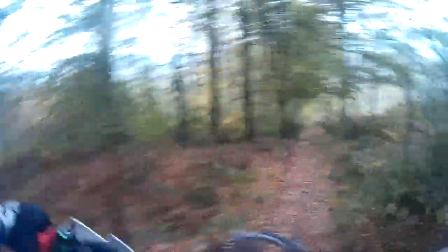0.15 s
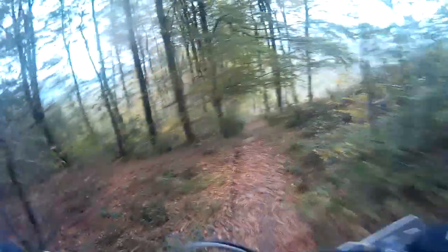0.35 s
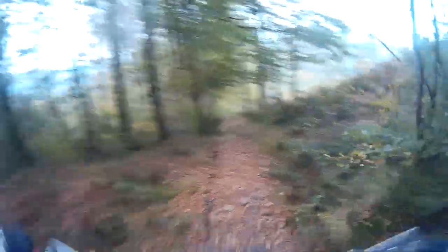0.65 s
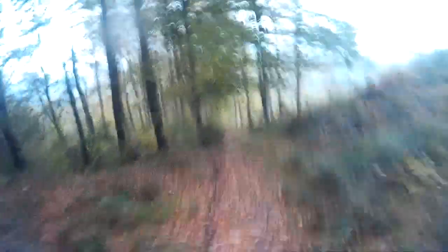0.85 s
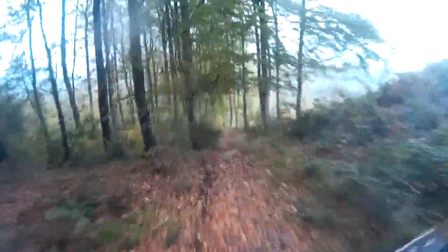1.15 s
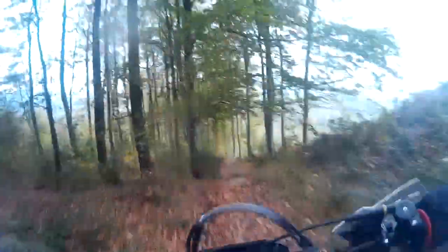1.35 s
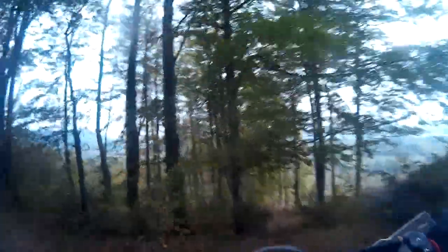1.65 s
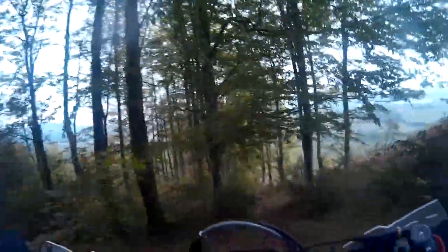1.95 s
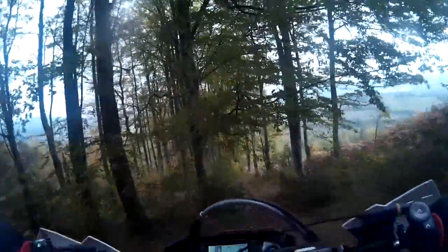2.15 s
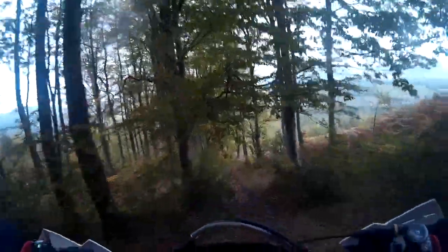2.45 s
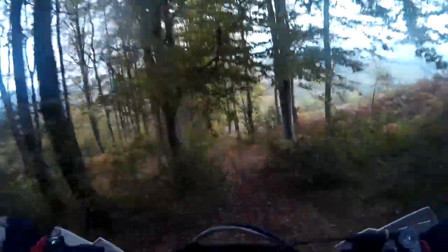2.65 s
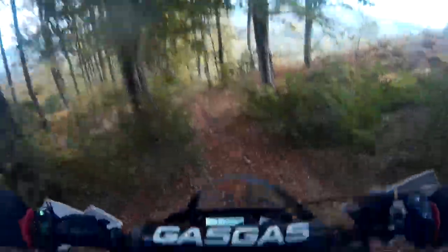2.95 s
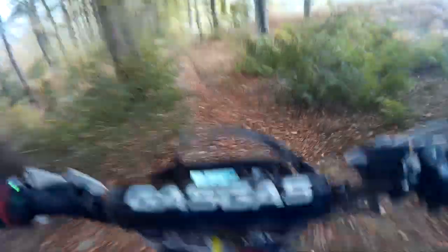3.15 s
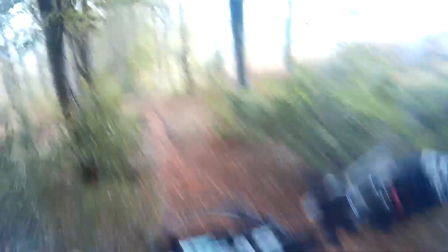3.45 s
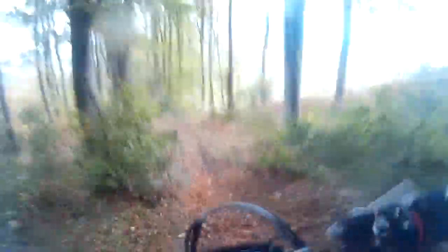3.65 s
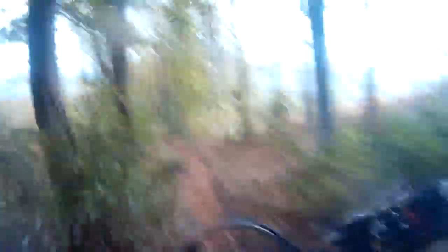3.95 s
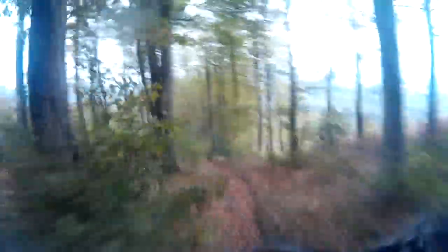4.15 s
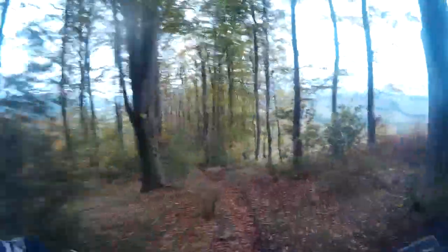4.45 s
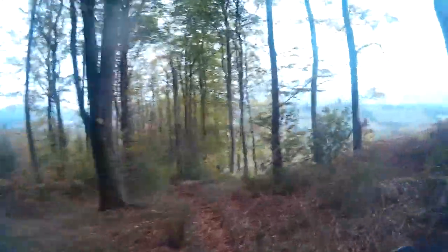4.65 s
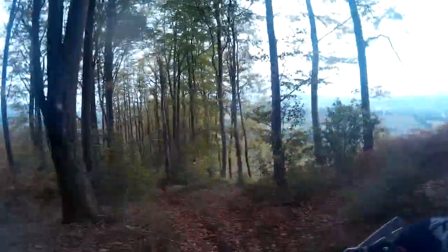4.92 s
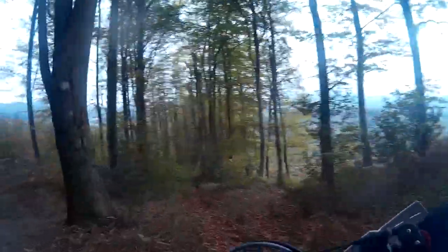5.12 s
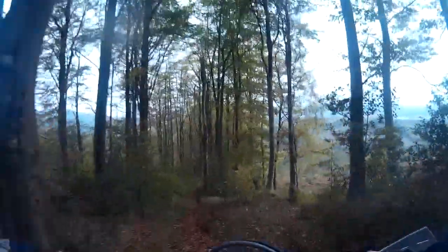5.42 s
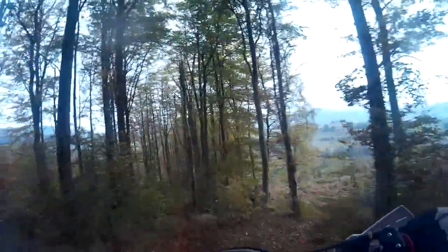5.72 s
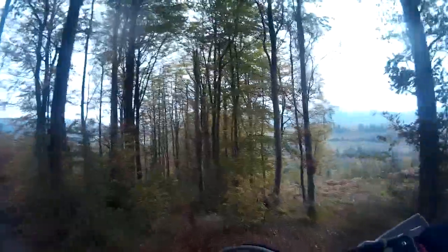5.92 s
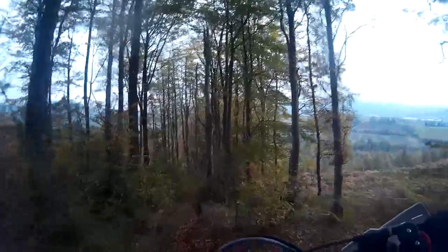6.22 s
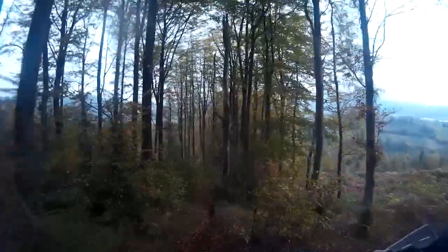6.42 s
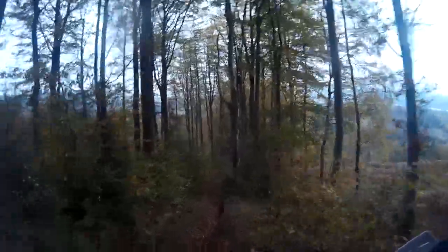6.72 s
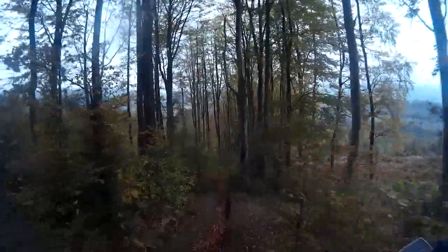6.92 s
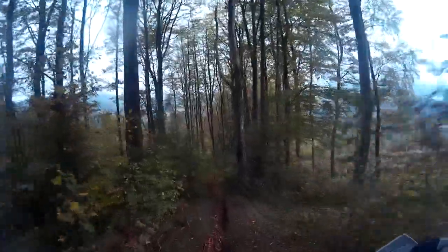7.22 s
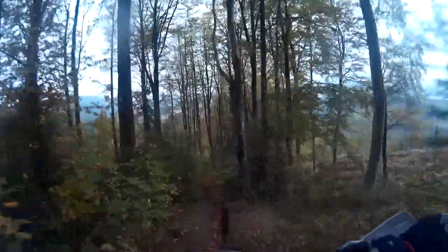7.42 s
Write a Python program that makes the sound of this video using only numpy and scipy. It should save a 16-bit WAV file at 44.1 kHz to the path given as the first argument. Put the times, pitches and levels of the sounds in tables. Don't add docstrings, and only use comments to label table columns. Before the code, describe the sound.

A boxy, buzzing single-cylinder motorcycle engine runs low along a leafy trail, with helmet rumble, knocks, an early scrape and a sharp crack near three seconds.

```python
import sys
import numpy as np
from scipy import signal
from scipy.fft import rfft, irfft
from scipy.io import wavfile
from scipy.ndimage import uniform_filter1d

SR = 44100
rng = np.random.default_rng(int(sys.argv[2]) if len(sys.argv) > 2 else 0)


def attenuation_scalar(level_db):
    decades = np.asarray(level_db, float) / 20
    return 10 ** decades


def store_pcm(level_fs):
    pcm = np.round(np.clip(level_fs, -1, 1) * 32767).astype(np.int16)
    wavfile.write(sys.argv[1], SR, np.atleast_2d(pcm).T)


N = 334229

# time in seconds, speed in turns per second.
CRANK_SPEED = [(0.0, 23.12), (0.29, 27.78), (0.8, 25.08), (1.05, 31.07), (1.65, 33.45), (1.71, 31.39),
               (2.06, 33.31), (2.72, 27.51), (3.4, 33.59), (3.85, 32.35), (4.45, 36.92), (4.86, 36.55),
               (4.99, 38.51), (5.81, 40.74), (6.28, 36.22), (6.69, 34.2), (6.82, 31.35), (7.58, 33.24)]
CAVITY_HZ, CAVITY_WIDTH_HZ = 1330, 26


def evened(x):
    return x / np.sqrt(np.mean(x ** 2) + 1e-20)


def steadied(x, size, share):
    power = uniform_filter1d(evened(x) ** 2, size)
    return evened(x / (power + 0.039) ** (share / 2))


def smooth_noise(size):
    return evened(uniform_filter1d(rng.standard_normal(N), size))


def column(rows, count):
    rows = np.array(rows)
    return np.interp(np.arange(N) / SR, rows[:, 0], rows[:, count])


def add(mix, s, sound):
    part = mix[round(s * SR):][:len(sound)]
    part += sound[:len(part)]


def ring(x, modes, tilt_db=0):
    out = np.zeros(len(x))
    for k, (hz, width_hz, db) in enumerate(modes):
        r, angle = np.exp(-np.pi * width_hz / SR), 2 * np.pi * hz / SR
        level = attenuation_scalar(db + tilt_db * np.log2(hz / 1000))
        gain = (-1) ** k * level * (1 - r) * 2 * np.sin(angle)
        out += gain * signal.lfilter([1], [1, -2 * r * np.cos(angle), r * r], x)
    return out


def coloured(points):
    hz, db = np.transpose(points)
    bins_hz = np.fft.rfftfreq(N, 1 / SR)
    shape = attenuation_scalar(np.interp(np.log(bins_hz + 1), np.log(hz + 1), db))
    return evened(irfft(rfft(rng.standard_normal(N)) * shape, N))


def dying(hz, t60_s, rise_s=0.00021, wave=np.sin):
    t = np.arange(round(.15 * SR)) / SR
    return wave(2 * np.pi * hz * t) * attenuation_scalar(-60 * t / t60_s) * (1 - np.exp(-t / rise_s))


def strokes(turns, at, spread_db):
    whole = np.floor(turns - at).astype(int) + 2
    strength = attenuation_scalar(spread_db * rng.standard_normal(400))[whole]
    return (turns - at) % 1, np.diff(whole, prepend=whole[0]), strength


def follows(db, share):
    # time in seconds, level in dB.
    load = [(0.0, -57), (0.38, -57), (0.65, -54.5), (0.91, -56.5), (1.39, -51.5), (1.94, -50),
            (2.22, -53.5), (2.74, -53.5), (3.44, -49), (3.76, -49.5), (4.14, -54), (4.87, -51.5),
            (5.47, -50), (6.06, -50.5), (6.33, -55.5), (7.07, -57.5), (7.26, -56.5), (7.58, -56)]
    return attenuation_scalar(db + share * (column(load, count=1) + 52))


def rasp(turns):
    # frequency in Hz, width in Hz, level in dB.
    case_modes = [(584, 33, -20), (713, 11, -19.5), (1189, 135, -7), (1326, 187, -6), (1586, 60, -9),
                  (1803, 50, -13), (1930, 55, -19), (2384, 214, -24.5), (2900, 380, -28.5),
                  (3830, 230, -30), (4700, 170, -39)]
    firing_turns, rise_turns, fade_turns = .27, .1, .44
    place, _, strength = strokes(turns, -.5, spread_db=1.4)
    strength = uniform_filter1d(strength, 200)
    after = (place - firing_turns) % 1
    gate = np.minimum(after / rise_turns, 1) * np.exp(-(after / fade_turns) ** 2.4)
    gate = uniform_filter1d(gate, 40)

    burst = ring((gate + .36) * rng.standard_normal(N), case_modes[2:7])
    burst = steadied(burst, size=1000, share=0.75)
    burst = signal.lfilter(*signal.butter(5, 2020, fs=SR), burst)
    drone = evened(ring((gate + 4.7) * rng.standard_normal(N), case_modes[:2]))
    cavity = ring(rng.standard_normal(N), [(CAVITY_HZ, CAVITY_WIDTH_HZ, 0)])
    cavity = steadied(cavity, size=250, share=.85)
    cavity = evened((uniform_filter1d(gate, 200) + .24) * cavity)
    body = strength * (attenuation_scalar(-5) * burst + cavity + attenuation_scalar(-21.5) * drone)
    return follows(-52, 0.7) * body + swish(gate, case_modes[7:])


def swish(gate, high_modes):
    # middle in seconds, length in seconds, level over the swish in dB.
    leaf_brushes = [
        (1.27, .2, 2.5),
        (3.16, 0.26, 4),
        (4.452, 0.48, 6),
        (5.004, .15, 3.5),
    ]
    t = np.arange(N) / SR
    brush_db = sum(db * np.exp(-(2 * (t - s) / length_s) ** 2) for s, length_s, db in leaf_brushes)
    hiss = evened(ring((1 + 0.2 * gate) * rng.standard_normal(N), high_modes))
    return follows(-75.5 + brush_db, 0.51) * hiss


def exhaust(turns):
    # frequency in Hz, width in Hz, level in dB.
    pipe_modes = [(251, 19, 0.5), (301, 58, -2)]
    # multiple of crank speed, level in dB.
    crank_orders = [(5, -5), (6, 0), (7, -2), (9, -10), (11, -10)]
    jitter_turns, choke_hz, choke_db_per_hz = .045, 33.5, -2.4
    uneven = evened(uniform_filter1d(uniform_filter1d(rng.standard_normal(N), 600), 600))
    place, opened, strength = strokes(turns + jitter_turns * uneven, .27, spread_db=1.5)
    flutter = .016 * np.exp(-place / .45) * rng.standard_normal(N)
    puff = uniform_filter1d(strength * (opened + flutter), 40)

    crank_hz = column(CRANK_SPEED, count=1)
    choke = attenuation_scalar(choke_db_per_hz * np.maximum(crank_hz - choke_hz, 0))
    pipe = follows(-60.5, .5) * choke * evened(ring(puff, pipe_modes))
    orders = sum(attenuation_scalar(db) * np.cos(2 * np.pi * k * (turns - .4)) for k, db in crank_orders)
    pull = attenuation_scalar(-70.5 + 1.3 * (crank_hz - 33.5))
    shake = attenuation_scalar(-58.5) * np.cos(2 * np.pi * (turns - .35))
    return pipe + pull * orders + shake


def rocking():
    # middle in seconds, level in dB, frequency in Hz.
    helmet_jolts = [(0.104, -45.8, 10), (0.646, -46.0, 10), (0.807, -38.6, 12), (0.902, -42.4, 14),
                    (1.002, -46.8, 14), (1.272, -35.1, 16), (1.517, -44.9, 16), (1.83, -48.5, 10),
                    (1.927, -46.2, 12), (2.714, -46.9, 14), (3.311, -41.7, 18), (3.392, -48.3, 10),
                    (3.553, -35.2, 18), (3.651, -43.2, 12), (3.723, -45.2, 12), (3.898, -39.2, 14),
                    (4.0, -43.1, 12), (4.116, -46.1, 12), (4.32, -44.3, 12), (4.617, -48.8, 10),
                    (4.712, -37.9, 14), (4.921, -46.9, 10), (5.034, -40.7, 12), (5.322, -38.8, 14),
                    (5.433, -45.0, 16), (6.059, -43.2, 14), (6.179, -43.1, 14), (6.687, -43.7, 16),
                    (7.104, -45.1, 12), (7.472, -40.7, 16)]
    tremble_mode = [(16, 15, 0)]  # Hz, width Hz, dB
    tremble = ring(ring(rng.standard_normal(N), tremble_mode), tremble_mode)
    out = attenuation_scalar(-62.5) * evened(tremble)
    for s, db, hz in helmet_jolts:
        turn = np.arange(-1, 1, hz / SR)
        swing = np.cos(np.pi * turn / 2) ** 2 * np.sin(-2 * np.pi * turn)
        add(out, s - 1 / hz, attenuation_scalar(db) * swing)
    return out


def rumble(swing):
    # frequency in Hz, level in dB per Hz.
    rumble_colour = [(15, -31), (25, 5), (50, -11), (87, -8), (134, -13), (243, -11), (520, -23),
                     (880, -120)]
    # frequency in Hz, level in dB per Hz.
    wash_colour = [(150, -47), (300, -16.5), (450, 4.5), (700, -11.5), (1000, 0.5), (1300, 1.5),
                   (2500, -24.5)]
    smooth_db, shake_db, shake_size = -64.5, -13, round(0.19 * SR)
    lumps = smooth_noise(1500)
    shake = uniform_filter1d(uniform_filter1d(swing ** 2, shake_size), shake_size)
    level = np.sqrt(attenuation_scalar(2 * smooth_db) + attenuation_scalar(2 * shake_db) * abs(shake))
    low = level * attenuation_scalar(1.76 * lumps + 4.0) * coloured(rumble_colour)
    return low + attenuation_scalar(-67 + 3.45 * lumps) * coloured(wash_colour)


def amplifier():
    # frequency in Hz, level in dB per Hz.
    hiss_colour = [(300, 0), (3000, 0), (6000, 0), (10000, -.5), (15000, -.5)]
    whine_hz, whine_db, hiss_db = 11860, -100, -71.75
    whine = attenuation_scalar(whine_db) * np.sqrt(2) * np.sin(2 * np.pi * whine_hz * np.arange(N) / SR)
    return attenuation_scalar(hiss_db) * coloured(hiss_colour) + whine


def thuds():
    # start in seconds, peak in dB, frequency in Hz.
    mount_thuds = [(0.05, -44.5, 315), (0.107, -49, 322), (0.65, -50, 340), (0.788, -33, 155),
                   (0.833, -46, 173), (0.877, -32, 273), (0.915, -38, 165), (0.993, -49, 288),
                   (1.253, -29.5, 192), (1.34, -48, 153), (1.511, -45.5, 310), (2.01, -42, 266),
                   (3.677, -32, 151), (3.838, -37.5, 254), (4.281, -44.5, 282), (4.318, -37, 157),
                   (4.475, -45, 294), (4.669, -45, 310), (4.709, -38, 155), (4.73, -26.5, 227),
                   (4.809, -31, 186), (4.876, -41, 207), (4.931, -37, 212), (5.231, -41, 237),
                   (5.275, -30, 178), (5.309, -37, 179), (5.821, -40, 262), (6.573, -48, 237),
                   (6.671, -33, 233), (7.279, -36, 240)]
    out = np.zeros(N)
    for s, db, hz in mount_thuds:
        t60_s = max(0.03 - 0.0016 * (db + 44), .008)
        add(out, s + 0.00284, attenuation_scalar(db + 3.0) * dying(hz, t60_s))
    add(out, 3.158, attenuation_scalar(-40) * dying(98, .2))
    return out


def scrapes():
    # start in seconds, hardest moment in seconds, end in seconds, level there in dB.
    drags = [
        (0.2, 0.278, 0.424, -35),
        (2.967, 3, 3.1, -53.5),
        (3.13, 3.16, 3.2, -55),
        (3.2, 3.248, 3.28, -48),
        (3.37, 3.47, 3.52, -40.5),
    ]
    # middle in seconds, peak in dB, length in seconds.
    squeaks = [(0.233, -34, 0.016), (0.26, -33, 0.006), (0.28, -30, 0.0074), (0.285, -42, 0.0089),
               (0.298, -30.5, 0.011), (0.361, -35, 0.0162), (0.37, -32, 0.018), (3.458, -53, 0.0062)]
    # frequency in Hz, width in Hz, level in dB.
    strap_modes = [(1336, 48, 6), (1596, 203, -7), (1800, 82, -8), (2310, 200, -23.5), (2940, 290, -33),
                   (3770, 120, -33), (4540, 190, -33.5)]
    ends_db = -12
    slips = rng.standard_normal(N) * attenuation_scalar(0.33 * smooth_noise(200))
    sound = steadied(ring(slips, strap_modes), size=900, share=0.71)
    out = np.zeros(N)
    for start, hardest, end, db in drags:
        a, b = round(start * SR), round(end * SR)
        rows = [(start, db + ends_db), (hardest, db), (end, db + ends_db)]
        level = attenuation_scalar(column(rows, count=1)[a:b] - 3)
        out[a:b] += level * sound[a:b] * signal.windows.tukey(b - a, .2)
    for s, db, length_s in squeaks:
        t = np.arange(round(length_s * SR)) / SR
        squeak = np.hanning(len(t)) * np.sin(2 * np.pi * CAVITY_HZ * t)
        add(out, s - length_s / 2, attenuation_scalar(db) * squeak)
    return out


def rattles():
    # start in seconds, peak in dB, brightness in dB per octave.
    case_ticks = [(0.655, -32, -3.5), (0.713, -57, 19), (0.7905, -31, -3.5), (0.9168, -38.5, 1),
                  (1.255, -32.5, -7.5), (1.748, -39.5, -14), (3.089, -32, -2.5), (3.15, -36, 9),
                  (3.182, -58, 19), (3.883, -35.5, 1), (4.7075, -35, -4), (4.7319, -33.5, 0.5),
                  (4.936, -36, -0.5), (5.232, -41, -2), (5.3082, -32.5, -7), (5.815, -41, 2),
                  (6.5774, -39.5, -0.5)]
    # frequency in Hz, width in Hz, level in dB.
    rattle_modes = [(390, 380, -2.5), (1286, 106, 10.5), (1557, 357, 3.5), (1936, 57, 3),
                    (2280, 170, -15.5), (3130, 38, -10), (3810, 99, -16)]
    fade_s = 0.0059
    out, t = np.zeros(N), np.arange(3000) / SR
    for s, db, tilt_db in case_ticks:
        chatter = rng.standard_normal(3000) * np.exp(-t / fade_s)
        tick = ring(uniform_filter1d(chatter, 5), rattle_modes, tilt_db)
        add(out, s, attenuation_scalar(db - 1.0) * tick / abs(tick).max())
    return out


def blows():
    # frequency in Hz, level in dB, t60 in seconds.
    shell_modes = [(565, -5, .03), (720, -10, .035), (1324, -14, .06), (1795, -3, .035), (1860, -10, .03),
                   (250, -12, .04), (1080, -9, .02), (860, -14, .015), (2320, -28, .04), (2950, -25, .02),
                   (4030, -28, .03), (4592, -40, .04)]
    # start in seconds, crack in dB, crack frequency in Hz, shell level in dB.
    landings = [
        (2.7637, -22, 1014, -42),
        (2.7748, -21.5, 1790, -29.5),
        (3.3163, -7.5, 1500, -25),
        (3.3181, -8.5, 1350, -25),
    ]
    # start in seconds, level in dB, frequency in Hz signed by direction.
    air_pushes = [
        (2.764, -20, 62),
        (3.3172, -23, -58),
        (3.319, -28, 132),
    ]
    out = np.zeros(N)
    shell = sum(attenuation_scalar(db) * dying(hz, t60_s) for hz, db, t60_s in shell_modes)
    for s, crack_db, crack_hz, shell_db in landings:
        snap = attenuation_scalar(-18.0) * (crack_hz / 1500) ** 2.7 * dying(4030, 0.0056, 0.00011)
        crack = dying(crack_hz, 6 / crack_hz, 0.00033) + snap
        hard = attenuation_scalar(crack_db) * crack + attenuation_scalar(shell_db) * shell
        add(out, s, np.convolve(hard, np.hanning(7) / 3))
    for s, db, hz in air_pushes:
        add(out, s, attenuation_scalar(db) * np.sign(hz) * dying(hz, 0.063, 0.00023, np.cos))
    return out


def scene():
    start_turns = .353
    turns = start_turns + np.cumsum(column(CRANK_SPEED, count=1)) / SR
    engine = rasp(turns) + exhaust(turns)
    swing = rocking()
    trail = swing + rumble(swing)
    contacts = thuds() + scrapes() + rattles() + blows()
    return (engine + trail + contacts)[None]


def roll_off(x):
    return signal.sosfilt(signal.butter(12, 15820, fs=SR, output="sos"), x)


def record(dry):
    return roll_off(dry + amplifier())


dry = scene()
out = record(dry)
store_pcm(out)
```